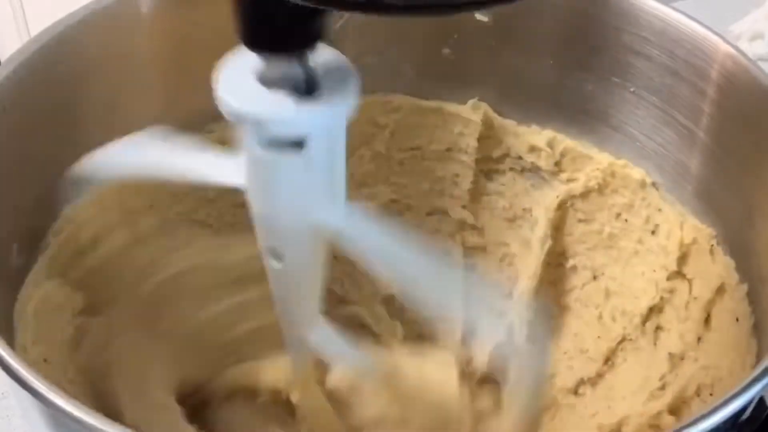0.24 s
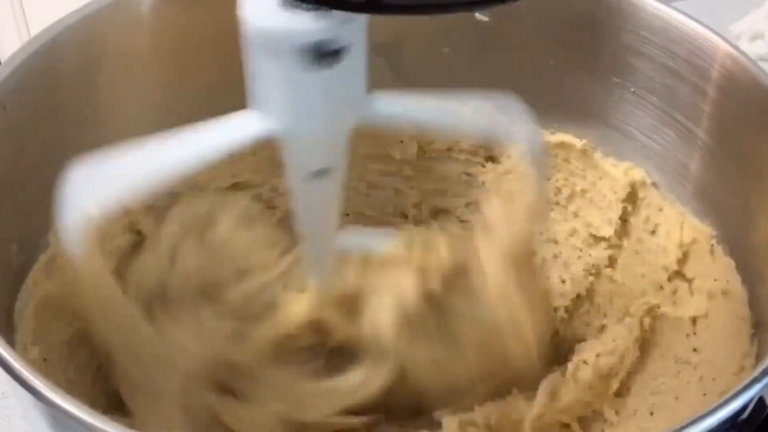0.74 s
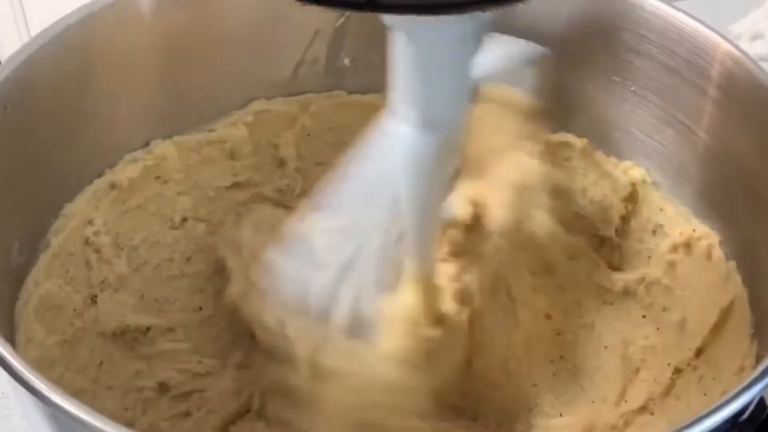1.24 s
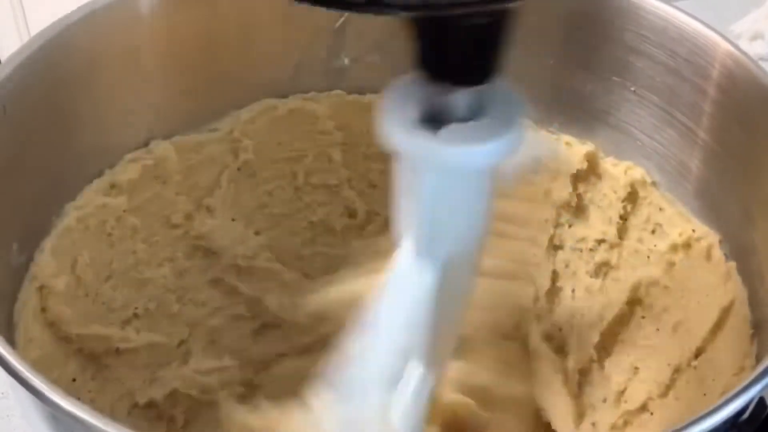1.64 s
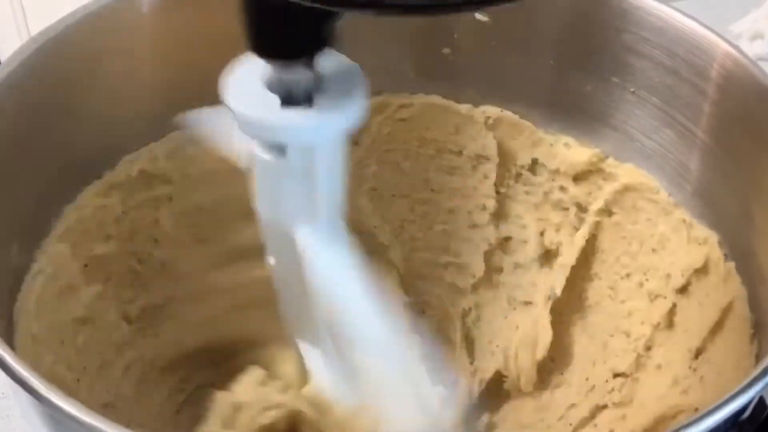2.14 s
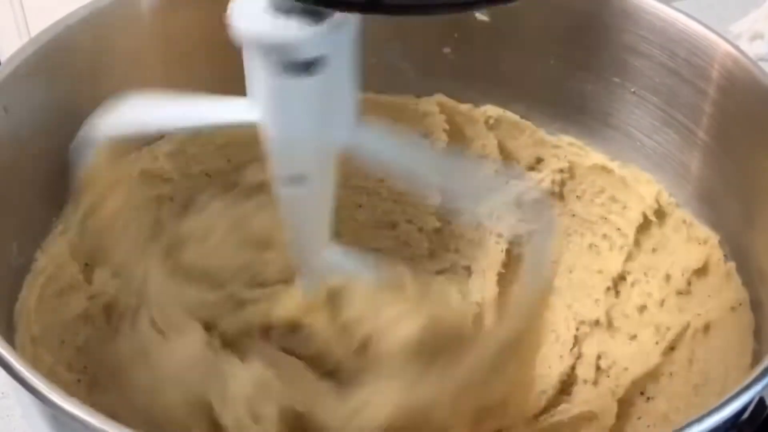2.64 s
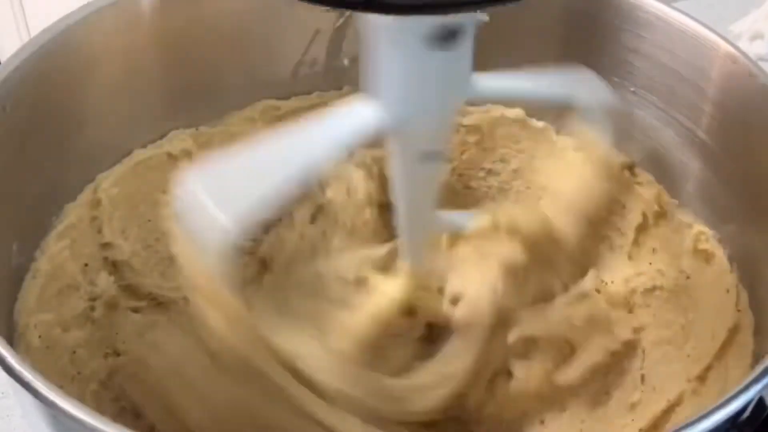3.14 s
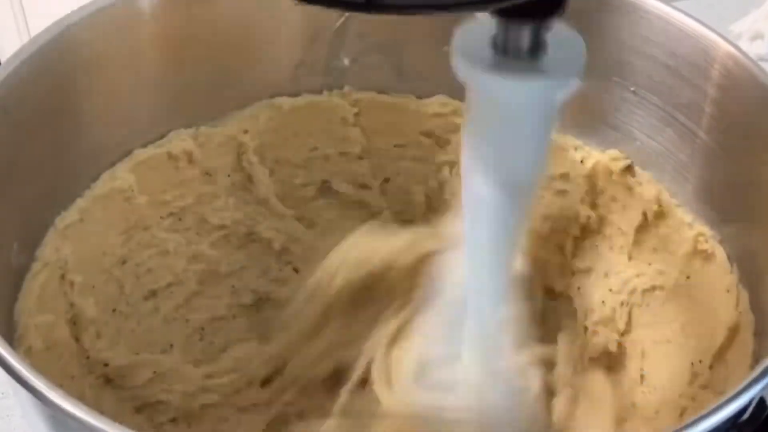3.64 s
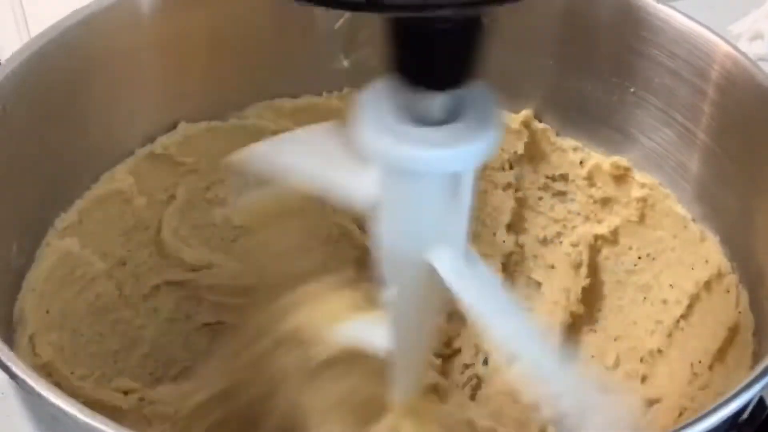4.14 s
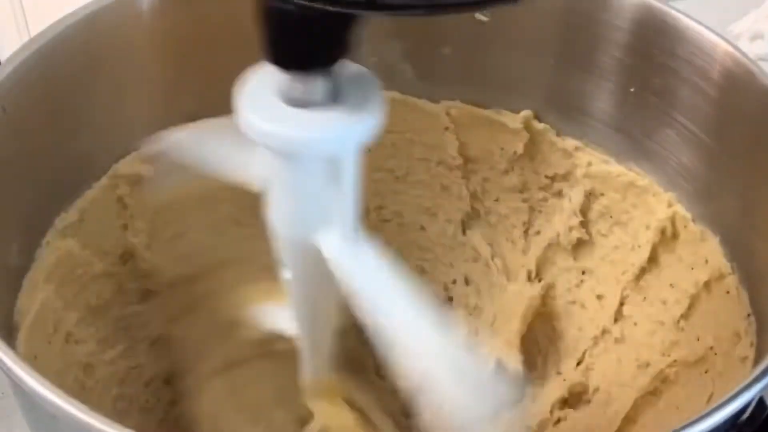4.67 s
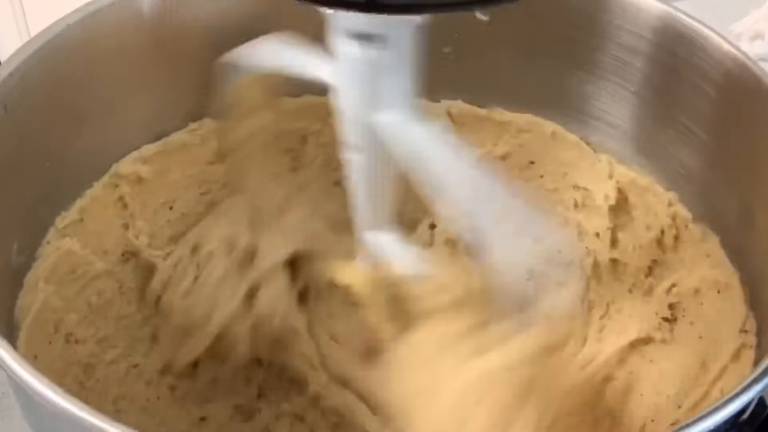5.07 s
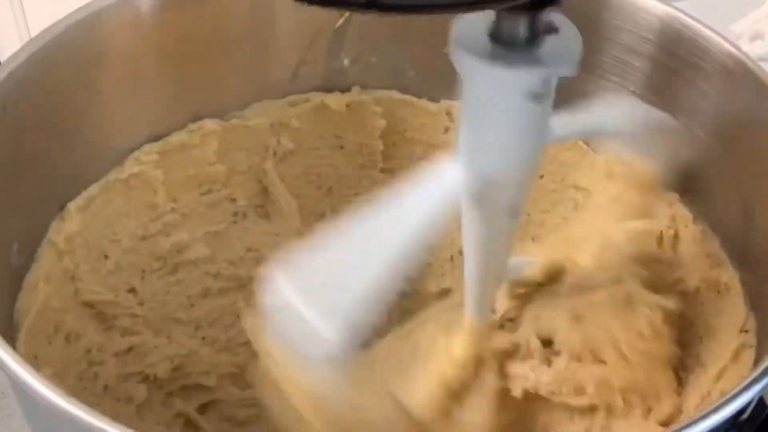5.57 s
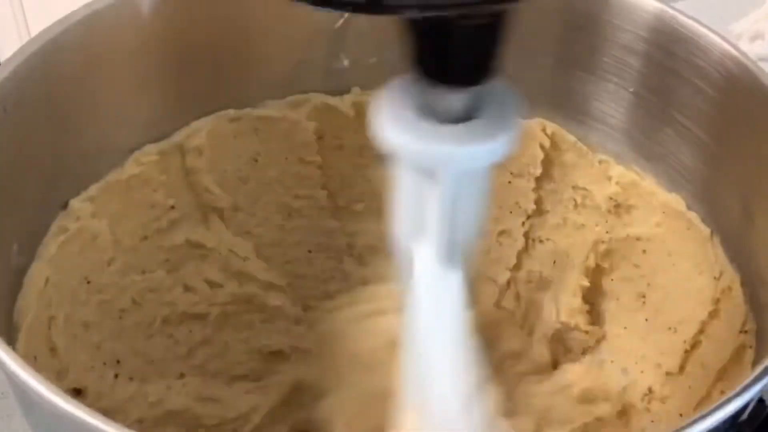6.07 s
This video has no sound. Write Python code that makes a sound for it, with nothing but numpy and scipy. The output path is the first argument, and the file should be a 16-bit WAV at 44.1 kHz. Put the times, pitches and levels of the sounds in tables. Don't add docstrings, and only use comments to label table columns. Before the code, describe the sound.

Close stereo pickup of a kitchen mixer working heavy dough without pause. Its grinding midrange whine stays near one pitch but trembles, with loudness surging about one and a half times a second. Steady mains hum and rushing brush and fan noise fill in around it. Loose gear clicks and scattered muted beater bumps rattle the housing and bowl, leaving only a brief room echo. It never starts up or stops.

```python
import sys
import numpy as np
from scipy import signal
from scipy.fft import rfft, irfft, next_fast_len
from scipy.io import wavfile

SR = 44100
rng = np.random.default_rng(int(sys.argv[2]) if len(sys.argv) > 2 else 0)


def ratio_of_db(decibels):
    return 10 ** (np.asarray(decibels, float) / 20)


def unload_wav(signal):
    wavfile.write(
        sys.argv[1],
        SR,
        np.round(np.clip(np.atleast_2d(signal).T, -1, 1) * 32767).astype(np.int16),
    )


N = 277995

# start_s, tooth_rate_hz, pressure_db
DOUGH = [(0.0, 911.8, -2.5), (0.42, 923, -0.1), (0.84, 929, 0.7), (1.26, 927, -0.8), (1.68, 920.5, -1.4),
         (2.1, 927.5, 1.0), (2.52, 929, 0.9), (2.94, 924, 0.1), (3.36, 929, 0), (3.78, 918, -3),
         (4.2, 929.7, 0), (4.62, 923.6, -0.5), (5.04, 919.6, -3), (5.46, 927.3, -1.4), (5.88, 924.2, -2.4),
         (6.3, 930, -1.5)]
ORBIT_PER_S, BEATER_PER_S = 1.587, 3.543
# spins, orbits, swing_hz, start_rad
BEATER_DRAG = [(0, 1, 1.8, -2.6), (1, -1, 2.2, -.4), (1, 0, 3.9, -1.4), (2, 0, 1.5, .7), (3, -3, 1.6, -1.6)]
# spins, orbits, first_order_db, first_order_rad, second_order_db, second_order_rad
TOOTH_PRESSURE = [(0, 1, 3.8, 2.9, .9, -.7), (0, 2, 1.5, -3.0, 2, -1.0), (0, 3, .7, 2.5, 1.2, 2.5),
                  (1, 0, .8, -1.9, .6, -1.6), (3, -3, .6, -2.0, 1, 3.1), (3, -1, .2, -1.8, 1.7, 3.1)]
FIRST_ORDER_DB, SECOND_ORDER_DB, THIRD_ORDER_DB, SIXTH_ORDER_DB = -24, -31, -38, -53

# turns_per_s, start_rad, speed_swing (share)
MOTOR_RUNOUT = (10.63, -2.6, .0065)
# turns_per_s, start_rad, speed_swing (share)
GEAR_RUNOUT = [
    (15.36, -.3, .0065),
    (30.72, -2.2, .008),
]
# order (multiple), level_db (above pressure), left_right_db, left_lead_rad,
# roughness (0-1), gear_runout_felt (share), then swing_db and lag_rad for each of three runouts
GEAR_ORDERS = [(1, -.3, -5.2, -1.42, .23, .4, 2.3, 5.3, 1.5, 1.6, 1.1, 1.4),
               (2, -2.5, -4, -2.15, .19, .75, 2.1, 5.3, 2.8, 1.7, 2.2, 1.2),
               (3, 0, -1.8, 1.37, .12, 1.25, 1.4, 4.8, .9, 2.9, 2.3, .1),
               (6, 0, 0, .5, .5, .5, 1, 0, .6, 2.3, .6, 1.7)]
# order (multiple), gear_turns_away, level_db, left_lead_rad
SIDE_TONES = [(1, -7, -20, -1.6), (2, -18, -15, 1), (3, -4, -13, 1.4), (3, 4, -13, 1.4)]

# multiple (of tooth rate), level_db, left_right_db, left_lead_rad
COMMUTATOR_WHINE = [(2.377, -54, -1, 2.4), (4.74, -42, -1.2, -2.35), (7.09, -51, 0, 2.0),
                    (7.5, -53, 0, 2.3), (9.49, -50, 0, 3.14)]
# pitch_hz, level_db, left_right_db, left_lead_rad, roughness (0-1)
HUM_LINES = [
    (92.1, -48, 1, -.15, .2),
    (119.9, -55, -1, .1, .3),
    (239.8, -56, -2.4, -.1, .3),
    (359.7, -60, .5, -1.7, .3),
    (479.7, -34.8, 6, -.7, .07),
    (599.7, -54, -1, -2.5, .2),
]

# pitch_hz, width_hz, level_db, left_right_db, left_lead_rad
CASING_MODES = [(219.8, 64, -46, 0.5, -0.14), (452, 60, -42, 3.5, -1.35), (760, 46, -41, 2, -2.57),
                (811.5, 82, -40, -12.5, -1.02), (1026, 65, -42, 8.5, 0.32), (1068, 90, -46, -15, -0.31),
                (1226, 43, -58, 5, -0.1), (1594, 95, -48.5, -8, 0.44)]
# start_s, level_db, struck_hz
BEATER_JOLTS = [(0.019, -13.5, 350), (0.096, -19.5, 1000), (0.449, -17, 810), (0.665, -13, 320),
                (0.766, -33, 790), (1.253, -21.5, 220), (1.319, -16, 500), (1.479, -22, 650),
                (1.681, -19, 787), (1.778, -17, 850), (1.893, -19, 450), (2.164, -28, 220),
                (2.571, -17.5, 220), (2.745, -21, 218.8), (2.904, -19.5, 817), (2.997, -23, 450),
                (3.548, -24, 790), (3.76, -21.5, 900), (3.863, -10.5, 401.6), (4.198, -26, 220.1),
                (4.415, -17, 700), (4.487, -22, 219.5), (4.763, -19, 790), (4.879, -14, 599),
                (4.989, -17, 900), (5.324, -17.5, 815.5), (5.458, -18, 779), (6.086, -16.5, 795)]
JOLT_FALL_DB_PER_OCT, JOLT_FALL_MAX_DB = 17.5, 12
KITCHEN_T60_S, KITCHEN_DB = .3, -6

# pitch_hz, level_db (per Hz)
HISS_SHARED = [(25, -31), (60, 4.5), (100, 6), (160, -0.5), (380, -0.5), (700, 4.5), (1300, -1), (2300, -4),
               (3100, -5.5), (7300, -7), (8250, -17), (8800, -35.5), (10500, -4.5), (15000, -11)]
# pitch_hz, level_db (per Hz)
HISS_OPPOSED = [(30, -36), (100, -16), (300, -3.5), (600, 5), (1300, -4), (2300, -3.5), (3100, -9.5),
                (4300, -2), (6000, -7.5), (7500, -3), (8700, 1), (10200, 0), (12000, -7), (15000, -51)]
HISS_DB = -28.5
# pitch_hz, width_hz, lift_db
HOUSING_PEAKS = [(375, 60, -4), (680, 120, -7), (2080, 80, 3), (3100, 200, -4), (4600, 250, 2),
                 (4950, 200, -4), (5450, 300, 2.5), (6500, 250, 3), (6800, 100, -3), (7220, 250, 4),
                 (7650, 300, -4), (8300, 150, 4), (8750, 400, 5), (10500, 300, 2.5), (12000, 200, 2),
                 (13100, 500, 2), (14300, 250, 3), (14550, 150, -6)]
# pitch_hz, quarter_turn_copy (share of the opposed part)
SIDEWAYS = [(100, 0), (600, 0.31), (1400, 0.28), (6000, -.2), (7300, -.4), (10200, .5), (12500, .6)]


def rms_one(x):
    return x / np.sqrt(np.mean(x ** 2) + 1e-20)


def in_time(rows):
    s, *columns = np.transpose(rows)
    return [np.interp(np.arange(N) / SR, s, column) for column in columns]


def at_hz(points, hz):
    point_hz, value = np.transpose(points)
    return np.interp(np.log(hz + 1), np.log(point_hz), value)


def drift(rate):
    r = np.exp(-40 * np.pi * rate / SR)
    noise = rng.standard_normal(N // 20 + 4002)
    slow = signal.lfilter([1], [1, -2 * r, r * r], noise)[4000:]
    return np.interp(np.arange(N) / 20, np.arange(len(slow)), rms_one(slow))


def turn(per_s, start):
    return 2 * np.pi * per_s * np.arange(N) / SR + start


def tone(angle, level_db, pan_db, lead, rough=0, rough_hz=30, apart=1):
    side = np.array([[.5], [-.5]])
    shared, own = (drift(rough_hz) + 1j * drift(rough_hz) for _ in range(2))
    scatter = 1 + rough * (shared + 2 * apart * side * own)
    level = np.sqrt(2) * ratio_of_db(level_db + side * pan_db)
    return level * np.real(scatter * np.exp(1j * (angle + side * lead)))


def beater(spins, orbits, start):
    return np.cos(turn(spins * BEATER_PER_S + orbits * ORBIT_PER_S, start))


def tooth_rate():
    drag_hz = sum(swing * beater(spins, orbits, start) for spins, orbits, swing, start in BEATER_DRAG)
    return in_time(DOUGH)[0] + drag_hz


def tooth_pressure():
    first_db = sum(db * beater(spins, orbits, rad) for spins, orbits, db, rad, _, _ in TOOTH_PRESSURE)
    second_db = sum(db * beater(spins, orbits, rad) for spins, orbits, _, _, db, rad in TOOTH_PRESSURE)
    first_db = FIRST_ORDER_DB + in_time(DOUGH)[1] + first_db
    return [first_db, SECOND_ORDER_DB + second_db, THIRD_ORDER_DB, SIXTH_ORDER_DB]


def gears(tooth_hz):
    runouts = [MOTOR_RUNOUT] + GEAR_RUNOUT
    motor, *gear = (share * np.cos(turn(per_s, start)) for per_s, start, share in runouts)
    slack = .003 * drift(20)
    gear_per_s = GEAR_RUNOUT[0][0]
    out = 0
    for row, load_db in zip(GEAR_ORDERS, tooth_pressure()):
        order, db, pan_db, lead, rough, felt, *swings = row
        speed = 1 + motor + slack + felt * sum(gear)
        angle = 2 * np.pi * np.cumsum(order * tooth_hz * speed) / SR
        for (per_s, start, _), swing_db, lag in zip(runouts, swings[::2], swings[1::2]):
            db = db + swing_db * np.cos(turn(per_s, start + lag))
        db = db + .7 / order * np.cos(2 * turn(*MOTOR_RUNOUT[:2]) + 3.3)
        out = out + tone(angle, load_db + db, pan_db, lead, rough, rough_hz=18, apart=.7)
        for side_order, turns, below_db, side_lead in SIDE_TONES:
            if side_order == order:
                side_angle = angle + turn(turns * gear_per_s, 0)
                side_db = np.mean(load_db) + below_db
                out = out + tone(side_angle, side_db, pan_db / 2, side_lead, .25, rough_hz=8)
    return out


def commutator(tooth_hz):
    per_s, start, _ = MOTOR_RUNOUT
    swing = .006 * np.cos(turn(per_s, start)) + .002 * drift(30)
    angle = 2 * np.pi * np.cumsum(tooth_hz * (1 + swing)) / SR
    throb_db = 1.8 * np.cos(turn(per_s, start + 2.8))
    return sum(tone(k * angle, db + throb_db, pan_db, lead, rough=.045 * k, rough_hz=60, apart=2.5 / k)
               for k, db, pan_db, lead in COMMUTATOR_WHINE)


def hum():
    return sum(tone(turn(hz, 0), db, pan_db, lead, rough, rough_hz=7.8)
               for hz, db, pan_db, lead, rough in HUM_LINES)


def rattle():
    per_s, start, _ = MOTOR_RUNOUT
    bunching_db = 2.5 * np.cos(turn(per_s, start + 1.3)) + 1.8 * beater(3, -1, -1.1) + 2.5 * drift(8)
    clicks_per_s = 900 * ratio_of_db(bunching_db)
    click_db = 5.7 * np.minimum(rng.exponential(1, N), 4)
    clicks = (rng.random(N) < clicks_per_s / SR) * ratio_of_db(click_db)
    jolt_s, jolt_db, struck_hz = np.transpose(BEATER_JOLTS)
    jolt_at = (jolt_s * SR).astype(int)
    size = next_fast_len(N + SR // 2)
    hz = np.arange(size // 2 + 1) * SR / size
    side = np.array([[.5], [-.5]])
    out = 0
    for mode_hz, width, db, pan_db, lead in CASING_MODES:
        fall_db = np.minimum(JOLT_FALL_DB_PER_OCT * abs(np.log2(mode_hz / struck_hz)), JOLT_FALL_MAX_DB)
        drive = rms_one(clicks * rng.standard_normal(N)) / np.sqrt(np.pi * width / 4 / SR)
        drive = ratio_of_db(db + 1.5) * drive
        drive[jolt_at] += ratio_of_db(jolt_db - fall_db - 10.5) * SR / width
        ring = rfft(drive, size) / (1 + 2j * (hz - mode_hz) / width) ** 2
        out = out + ring * ratio_of_db(side * pan_db) * np.exp(1j * side * lead)
    return ratio_of_db(-4.0) * irfft(out, size)[:, :N]


def kitchen(x):
    t = np.arange(SR // 2) / SR
    tail = rng.standard_normal((2, len(t))) * ratio_of_db(-60 * t / KITCHEN_T60_S) * (t > .004)
    tail = signal.sosfilt(signal.butter(2, 350, "high", fs=SR, output="sos"), tail)
    tail = tail / np.sqrt(np.sum(tail ** 2, axis=1, keepdims=True))
    return ratio_of_db(KITCHEN_DB) * signal.fftconvolve(x, tail, axes=1)[:, :N]


def hiss():
    hz = np.arange(N // 2 + 1) * SR / N
    lift_db = sum(db / (1 + (2 * (hz - peak_hz) / width) ** 2) for peak_hz, width, db in HOUSING_PEAKS)
    share = np.clip(at_hz(SIDEWAYS, hz), -1, 1)
    per_s, start, _ = MOTOR_RUNOUT
    rotor_db = .5 * np.cos(turn(HUM_LINES[0][0], 0))
    runout_db = .45 * np.cos(turn(per_s, start)) + .3 * np.cos(2 * turn(per_s, start))
    pulse_db = rotor_db + runout_db + .7 * drift(7)
    patchy_db = 2.0 * drift(25)
    low = 1 / (1 + (hz / 1500) ** 2)

    def noise():
        bass = rfft(ratio_of_db(patchy_db) * rng.standard_normal(N))
        treble = rfft(ratio_of_db(pulse_db) * rng.standard_normal(N))
        return np.sqrt(low) * bass + np.sqrt(1 - low) * treble

    first, second = noise(), noise()
    opposed = share * -1j * first + np.sqrt(1 - share ** 2) * second
    mid = irfft(first * ratio_of_db(at_hz(HISS_SHARED, hz) + lift_db), N)
    side = irfft(opposed * ratio_of_db(at_hz(HISS_OPPOSED, hz) + lift_db), N)
    return ratio_of_db(HISS_DB) * rms_one(np.array([mid + side, mid - side]))


def scene():
    tooth_hz = tooth_rate()
    knocks = rattle()
    return gears(tooth_hz) + commutator(tooth_hz) + hum() + knocks + kitchen(knocks) + hiss()


def band_limit(x):
    return signal.sosfilt(signal.butter(12, 15720, fs=SR, output="sos"), x)


def record(dry):
    mix = signal.sosfilt(signal.butter(1, 30, "high", fs=SR, output="sos"), dry)
    mix = signal.sosfilt(signal.cheby2(5, 12, 15700, fs=SR, output="sos"), mix)
    return band_limit(mix)


dry = scene()
out = record(dry)
unload_wav(out)
```